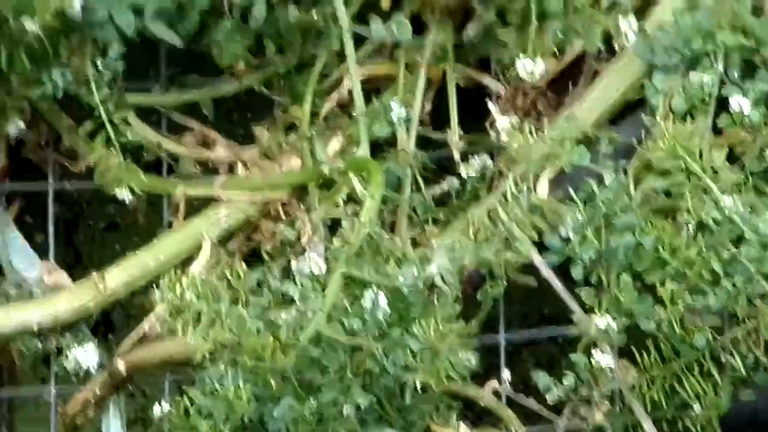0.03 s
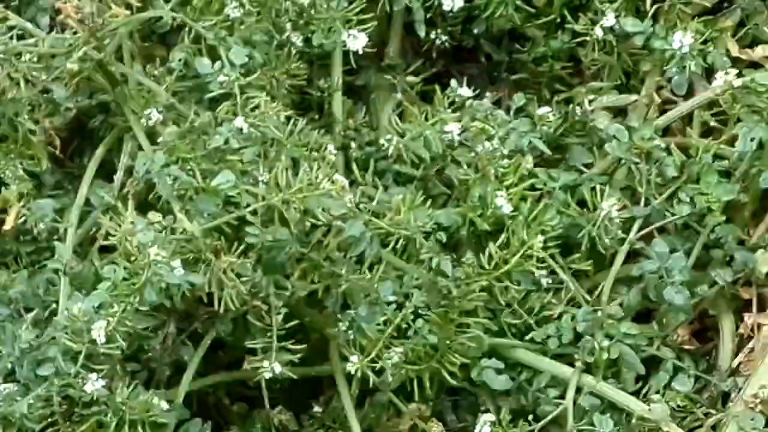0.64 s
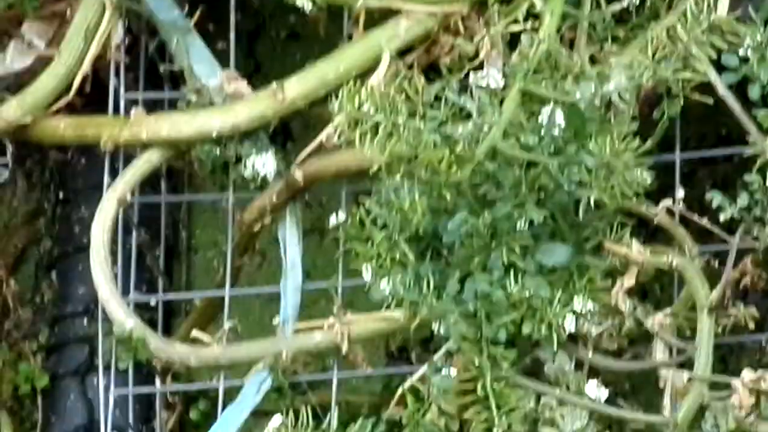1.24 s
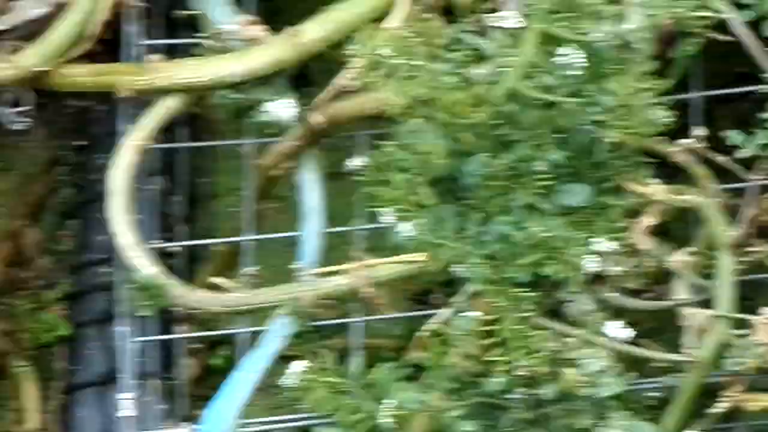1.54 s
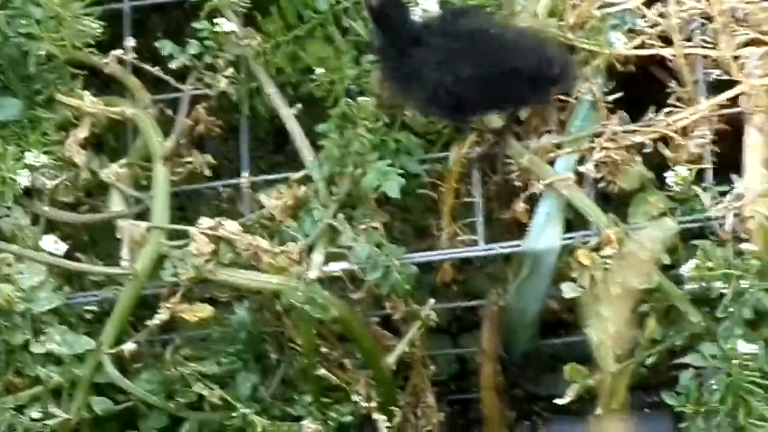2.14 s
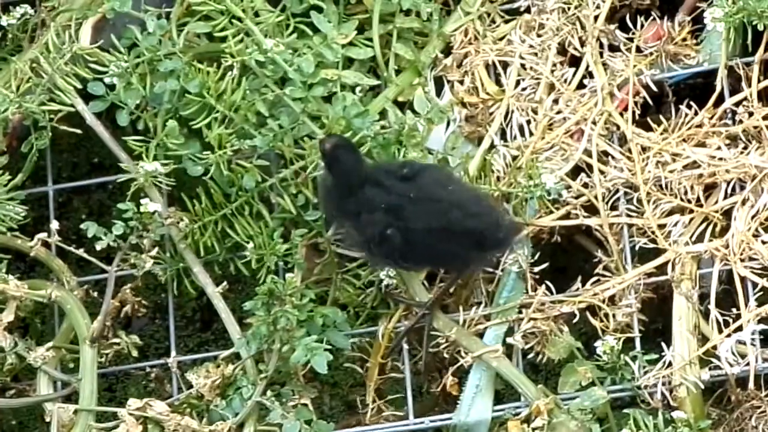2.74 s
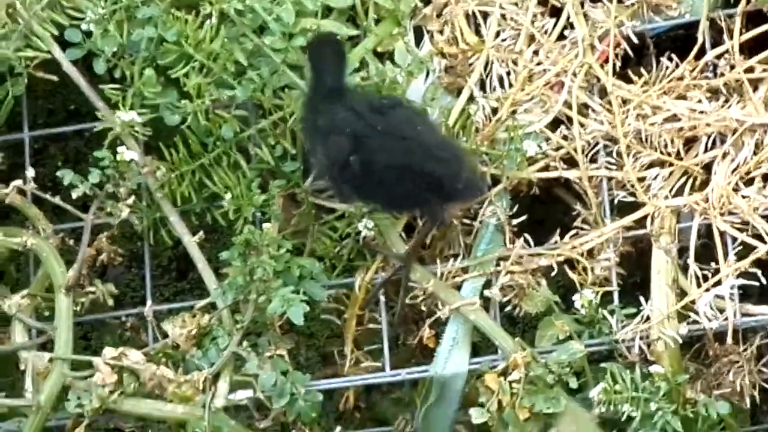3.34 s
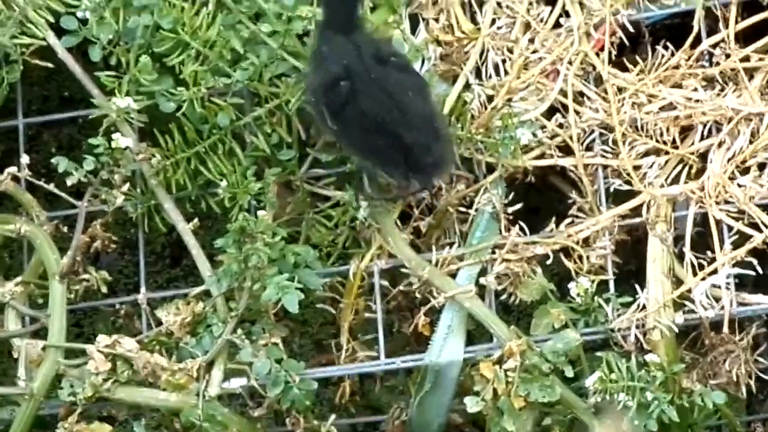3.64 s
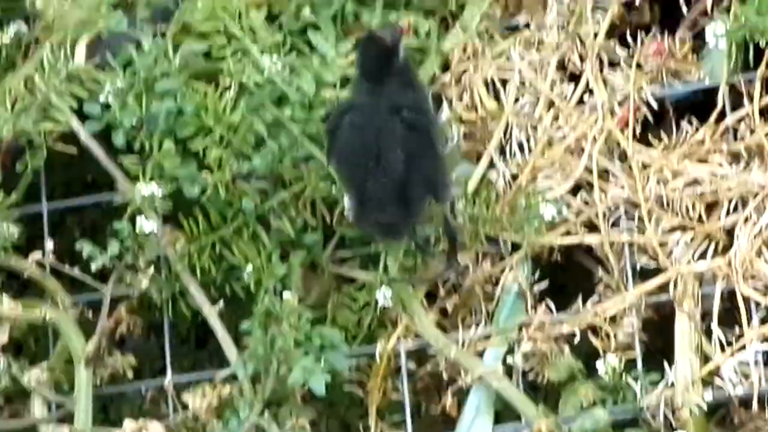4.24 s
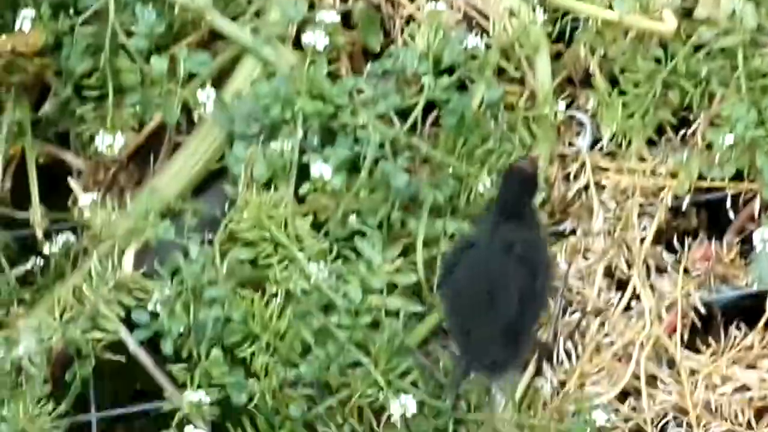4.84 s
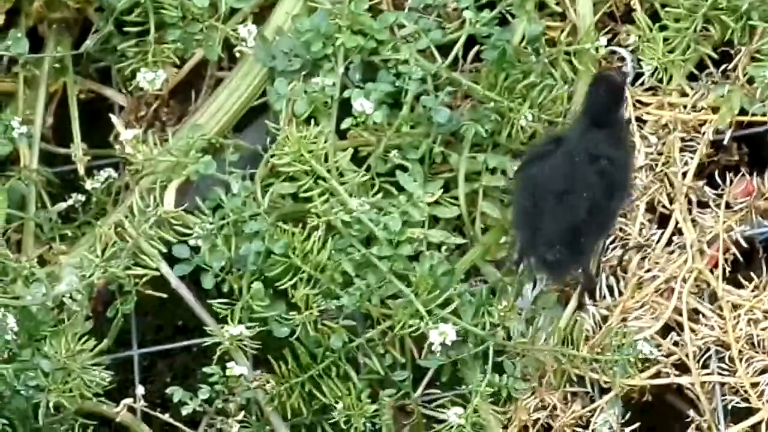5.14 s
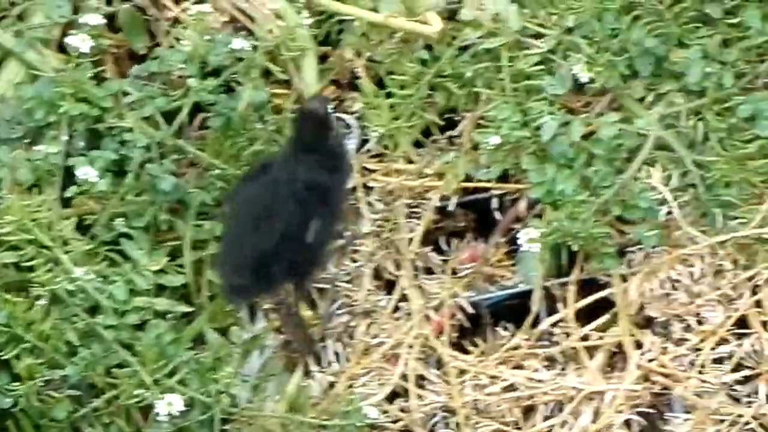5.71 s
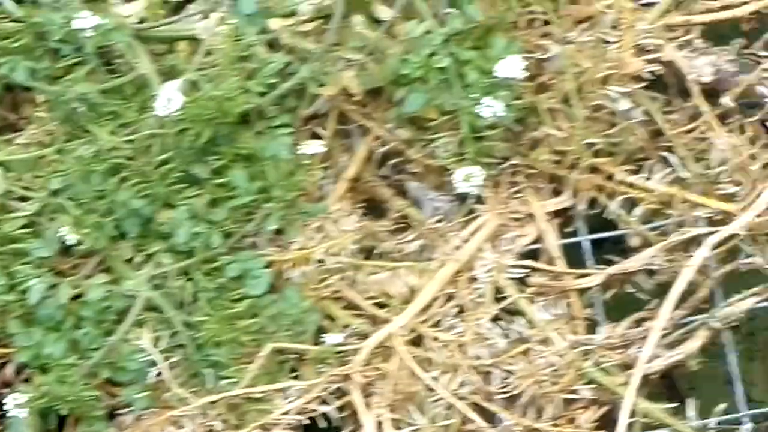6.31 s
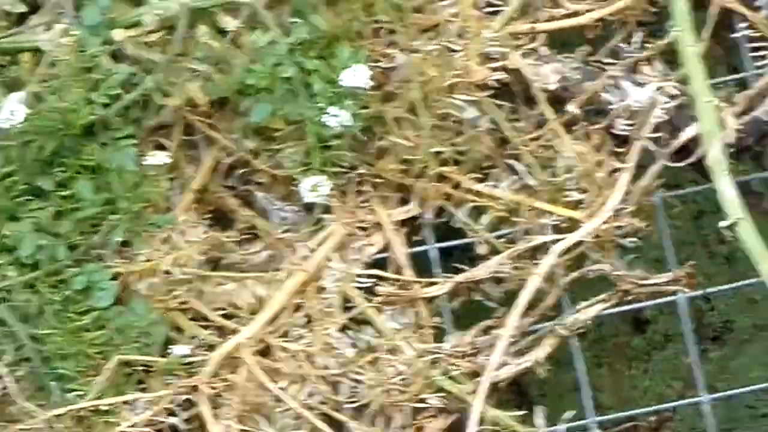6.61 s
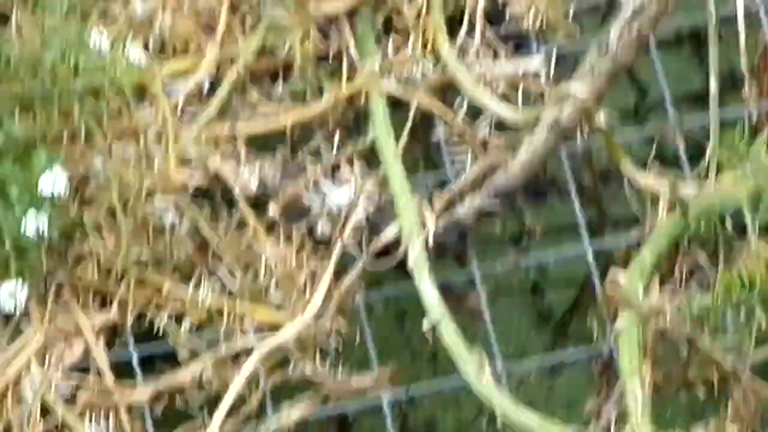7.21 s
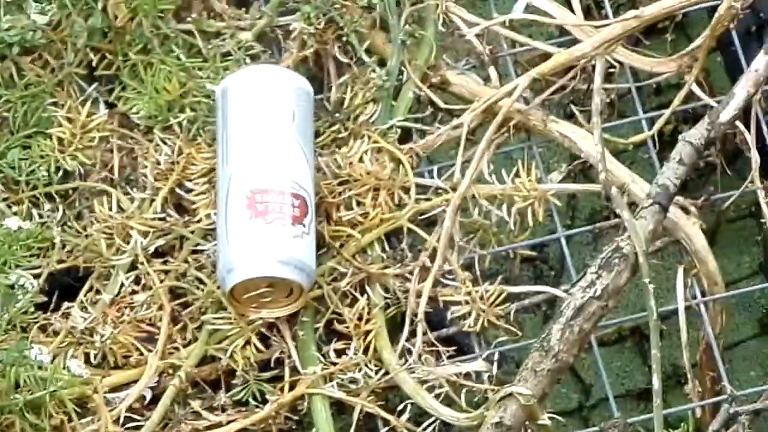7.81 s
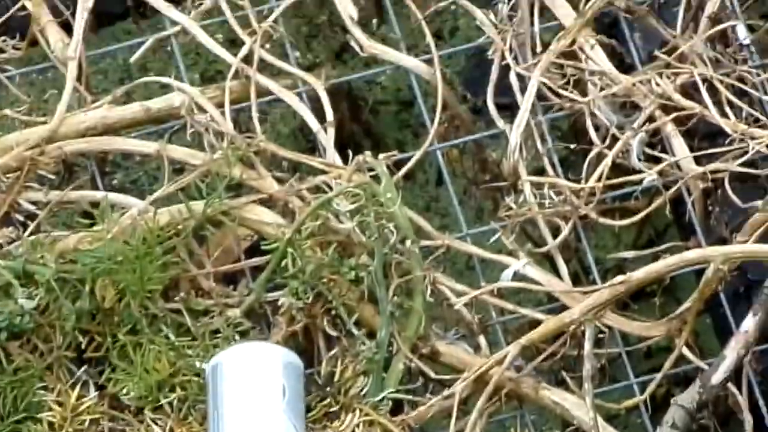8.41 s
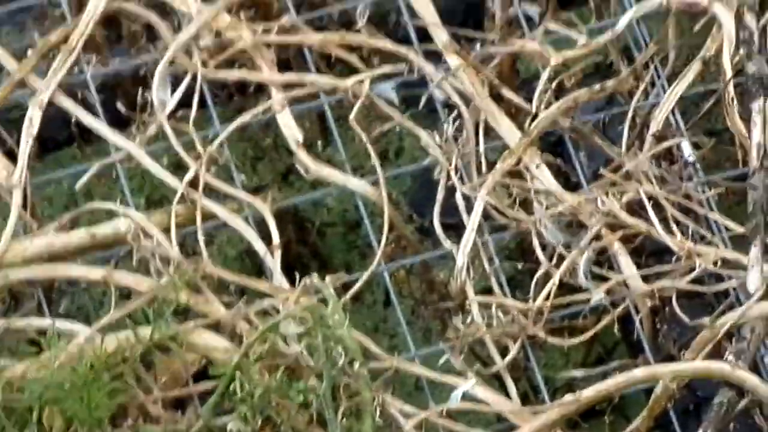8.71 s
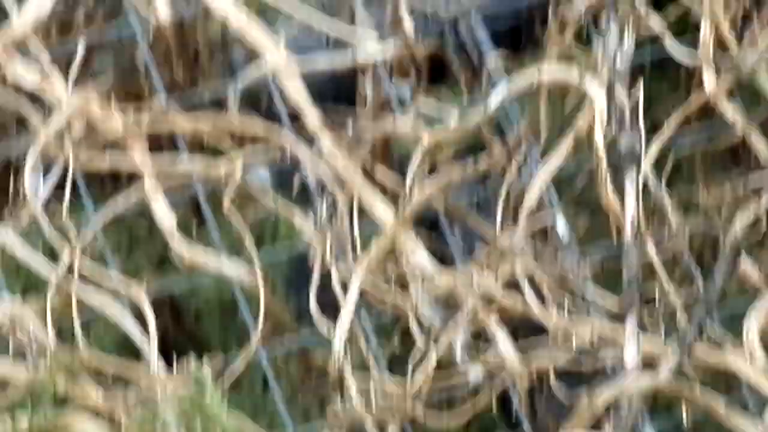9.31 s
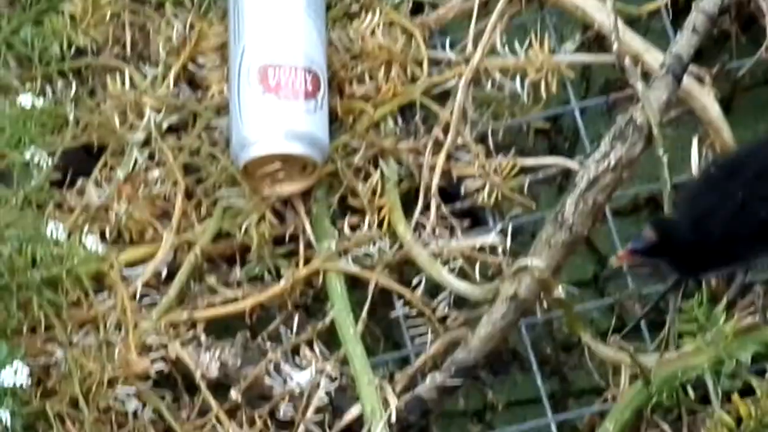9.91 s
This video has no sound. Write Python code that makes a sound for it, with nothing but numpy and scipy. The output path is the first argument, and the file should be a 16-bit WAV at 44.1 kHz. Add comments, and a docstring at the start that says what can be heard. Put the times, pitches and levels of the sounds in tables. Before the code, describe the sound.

At an overgrown pond, running water makes an even hiss that slowly grows louder. A sharp knock and a brief finger scrape hit the hand-held microphone first, then gusts of wind and dull thuds keep buffeting it. A pigeon coos four times, each a few spaced notes speeding into a falling purr, the last loudest. A moorhen chick peeps faintly and an adult clucks twice. The hiss drops suddenly near the end.

```python
"""A pigeon gives four purring coos, each a few spaced notes that speed up into a falling roll.
Behind it, at an overgrown pond, the countless splashes of running water merge into a hiss,
and moorhens peep and cluck faintly. Wind buffets the hand-held microphone, and fingers knock
and rub on its case. The whole sound slowly grows louder, then drops suddenly near the end."""
import sys
import numpy as np
from scipy import signal
from scipy.fft import rfft, irfft
from scipy.io import wavfile
from scipy.ndimage import uniform_filter1d

SR = 44100
rng = np.random.default_rng(int(sys.argv[2]) if len(sys.argv) > 2 else 0)


def transcribe(signal):
    """Save signal, clipped to [-1, 1], as a 16-bit WAV file at the path in sys.argv[1]."""
    frames = np.atleast_2d(signal).T
    limited = np.clip(frames, -1, 1)
    pcm = np.round(limited * 32767).astype(np.int16)
    wavfile.write(sys.argv[1], SR, pcm)


N = 438794
TIME = np.arange(N) / SR
LEAD_S = 0.03   # notes and thuds begin this long before their loudest moment

# the base level of the sound, which slowly grows louder: time_s, level_db
BASE_RISE = [(0.8, -70.5), (4.18, -52.5), (4.68, -52.5), (5.14, -49), (6.24, -45.5), (7.91, -37.5),
             (8.85, -38), (8.9, -40.5), (9.01, -39.5)]
# its sudden drop near the end: time_s, level_db
BASE_DROP = [(9.05, -46), (9.804, -45), (9.95, -43.5)]
# the mix of low and high sound in the water: frequency_hz, relative_db
WATER_COLOUR = [(100, 5), (400, 1), (620, 1.5), (800, 0), (1400, -1), (2400, 0), (4000, -3), (5600, -5),
                (7300, -5.5), (8800, -1.3), (9600, -6), (10800, -16), (12500, -29.5), (16000, -33)]
# the same for light wind: frequency_hz, relative_db
BREEZE_COLOUR = [(15, -6), (30, -12.5), (50, -1.5), (80, 0.5), (130, -1.5), (200, -10), (300, -20),
                 (500, -34), (1000, -40.5)]
# the same for the small swirls of air in a gust: frequency_hz, relative_db
SWIRL_COLOUR = [(40, -20), (75, -9), (130, 2.5), (210, 1), (320, -5.5), (480, -14.5), (750, -28),
                (1500, -47)]
# the strength of the light breeze: time_s, above_base_db
BREEZE = [(0.15, -7), (0.38, -1), (0.62, -18), (0.9, -4), (1.7, -2.5), (2.35, -5), (3.2, -0.5), (4.8, 3),
          (5.3, -7.5), (6.4, -4), (6.8, -11), (7.8, -6.5), (8.5, -6.5), (9.9, -4.5)]
# gusts of wind: start_s, hold_s, above_base_db
GUSTS = [(0.424, 0.032, 22.5), (0.772, 0.13, 8.5), (1.078, 0.095, 11), (1.23, 0.11, 2), (1.396, 0.13, 5.5),
         (1.575, 0.35, 4), (2.018, 0.2, 6.5), (2.46, 0.07, 4), (2.602, .16, 2.5), (2.846, .1, 3),
         (3.02, 0.12, 0.5), (3.534, 0.22, 9.5), (3.793, .025, 12), (3.88, 0.092, 3.5), (4.057, 0.17, 8.5),
         (4.288, 0.053, 11.5), (4.342, 0.035, 14.5), (4.494, 0.12, 0), (5.018, 0.099, 2.5),
         (5.513, .089, 0.5), (5.666, 0.079, 8), (5.798, 0.043, 16), (5.892, 0.21, 12.5),
         (6.475, 0.077, 2.5), (7.913, 0.29, -0.5), (8.304, 0.3, 2), (8.787, 0.29, 3), (9.17, 0.13, 2),
         (9.454, 0.11, -2), (9.595, 0.28, 2)]
# faint, short plinks, one at the very start: start_s, pitch_hz, peak_db, spread (a share of the pitch)
PLINKS = [(0.012, 555, -56.5, .11), (0.252, 400, -45, 0.35), (0.256, 700, -46, 0.25),
          (0.413, 560, -54, 0.37), (4.335, 680, -43.5, 0.32)]
# fingers knocking on the case: start_s, peak_db, body_hz, edge_hz
KNOCKS = [(0.0706, -11, 100, 994), (0.2585, -28, 74, 520)]
# dull thuds of air and hand on the microphone: time_s, peak_db, pitch_hz, decay_s
THUDS = [(0.416, -37, 240, 0.0017), (0.437, -39, 190, 0.0026), (0.452, -43, 172, 0.0026),
         (0.8, -50, 137, 0.0059), (1.099, -42, 193, 0.0037), (1.477, -42, 144, 0.0032),
         (1.874, -38, 173, 0.002), (2.483, -37, 218, 0.0017), (2.612, -50, 190, .005),
         (2.905, -52, 120, 0.004), (3.125, -48, 120, .005), (3.435, -26.5, 175, 0.0026),
         (3.578, -37, 218, 0.0041), (3.63, -29.5, 193, 0.0025), (3.693, -28, 159, 0.0048),
         (3.801, -32.5, 129, 0.011), (3.905, -33, 95, 0.0066), (4.168, -20.5, 136, 0.0016),
         (4.184, -29, 161, 0.0061), (4.322, -28.5, 199, .005), (4.355, -23, 85, 0.0084),
         (4.372, -23.5, 170, 0.003), (4.497, -22, 153, 0.0019), (4.512, -34, 150, 0.0056),
         (4.653, -23.5, 181, 0.0034), (5.543, -37, 84, 0.013), (5.733, -30.5, 190, .005),
         (5.753, -28.3, 130, 0.005), (5.783, -23, 150, 0.0032), (5.801, -19.5, 94.5, 0.012),
         (5.82, -19.5, 193, 0.007), (5.83, -19.5, 260, 0.0026), (5.897, -25, 130, .005),
         (5.925, -24, 190, 0.0035), (5.948, -25, 150, 0.005), (5.972, -21.5, 190, 0.0025),
         (5.999, -9, 221, 0.0014), (6.022, -24.5, 170, .004), (6.053, -21.5, 221, 0.0023),
         (6.076, -23, 150, 0.0034), (6.101, -16, 96, 0.007), (6.371, -27.5, 178, 0.0033),
         (7.066, -34, 120, 0.005), (7.35, -26.5, 95, 0.0068), (7.912, -18.5, 194, 0.0028),
         (7.929, -27, 114, 0.0072), (8.089, -18, 164, 0.0034), (8.552, -21, 141, 0.0073),
         (8.782, -27, 150, 0.0066), (8.863, -21, 200, 0.0042), (8.954, -23, 153, 0.0052),
         (8.998, -25, 170, 0.0036), (9.013, -16, 160, 0.0025), (9.052, -22.5, 107, 0.0032),
         (9.227, -31.3, 75, 0.0076), (9.42, -32.5, 100.6, 0.005), (9.639, -27, 107, 0.0033),
         (9.675, -28, 162, 0.0029), (9.755, -23.5, 120, 0.0051)]
# small sharp ticks, each with a bright crack: start_s, tick_db, crack_db
TICKS = [(0.588, -46, -46), (0.745, -52, -59), (9.013, -41, -32)]
# a fingertip skidding over the case: time_s, pitch_hz, peak_db
SKID = [(0.136, 3400, -82), (0.24, 3160, -63), (0.259, 3100, -49), (0.268, 3250, -45), (0.285, 5070, -47),
        (0.293, 7160, -60), (0.32, 8200, -61), (0.375, 8470, -62)]
# the hardest slips of that fingertip: start_s, peak_db, pitch_hz
HARD_SLIPS = [(0.267, -40, 3500), (0.2724, -50, 4000), (0.2772, -47, 4500), (0.2821, -43, 5200),
              (0.2865, -52, 6250)]
# a moorhen chick's peeps: start_s, top_pitch_hz, peak_db
PEEPS = [(4.065, 4350, -59), (5.795, 4660, -50), (5.828, 5400, -59)]
# a grown moorhen's double cluck: middle_s, pitch_hz, peak_db
CLUCKS = [(8.048, 1650, -28), (8.070, 1710, -31)]
# the spaced notes that open each coo: middle_s, pitch_hz, peak_db
COO_NOTES = [(2.03, 420, -61), (2.099, 378, -60), (2.193, 369, -47.5), (2.272, 372, -50), (2.336, 376, -48),
             (2.388, 383, -51), (2.416, 380, -48), (4.81, 370, -41.5), (4.894, 354, -41), (4.97, 375, -43),
             (5.009, 368, -39), (5.043, 379, -42), (5.092, 378, -41), (6.178, 365, -40), (6.25, 382, -41),
             (6.325, 390, -39), (6.42, 420, -43), (8.028, 430, -31.5), (8.104, 404, -33), (8.18, 397, -34),
             (8.27, 364, -27), (8.347, 370, -26.5), (8.414, 379, -25), (8.47, 390, -25.5),
             (8.506, 388, -28)]
# the purring roll that ends each coo:
# start_s, length_s, pitch_hz, sag (a share of the pitch), first_notes_per_s, last_notes_per_s, level_db
COO_ROLLS = [(2.468, 0.41, 383, 0.3, 49, 55, -47.5), (5.118, 0.3, 372, 0.23, 43, 52.5, -39.5),
             (6.438, 0.26, 382, 0.29, 46, 53, -40), (8.529, 0.42, 397, .16, 47, 60.5, -24.8)]


def from_db(db):
    """Turn decibels into a number to multiply a sound by."""
    return 10 ** (np.asarray(db) / 20)


def rms_one(x):
    """Scale a sound so that its average power is 1."""
    return x / np.sqrt(np.mean(x ** 2) + 1e-20)


def follow(rows, at=TIME):
    """Join a table's rows with straight lines and read each column at the given times."""
    times, *columns = np.transpose(rows)
    return [np.interp(at, times, column) for column in columns]


def filtered(x, hz, kind, order=2):
    """Keep the low part, the high part or a middle band of a sound."""
    return signal.sosfilt(signal.butter(order, np.clip(hz, 10, .45 * SR), kind, fs=SR, output="sos"), x)


def noise(colour):
    """Random noise with the given mix of low and high sound."""
    hz, db = np.transpose(colour)
    all_hz = np.maximum(np.arange(N // 2 + 1) * SR / N, 1)
    gain = from_db(np.interp(np.log(all_hz), np.log(hz), db))
    return rms_one(irfft(rfft(rng.standard_normal(N)) * gain, N))


def drift(per_s):
    """A random wobble that slides to a new value per_s times a second."""
    points = np.clip(rng.standard_normal(4096), -2, 2)
    return rms_one(np.interp(TIME * per_s, np.arange(len(points)), points))


def add(track, s, sound):
    """Mix a short sound into a track, starting at s seconds."""
    start = int(np.clip(s * SR, 0, N - 1))
    track[start:start + len(sound)] += sound[:N - start]


def water(base_db, boost_db=2.0, flutter_db=0.46, hush_db=-18.5, opens_s=0.21, opening_s=0.05):
    """Countless far splashes merge into an almost even hiss."""
    hushed = 1 - np.clip((TIME - opens_s) / opening_s, 0, 1)   # the first moment sounds quieter
    level_db = base_db + boost_db + hush_db * hushed + flutter_db * drift(40)
    return from_db(level_db) * noise(WATER_COLOUR)


def wind_strength(rise_s=0.021, fall_s=0.02):
    """Gusts spring up over the breeze, hold and die away; gives decibels above the base level."""
    power = from_db(follow(BREEZE)[0]) ** 2
    for s, hold_s, db in GUSTS:
        fade = np.maximum(s - TIME, 0) / rise_s + np.maximum(TIME - s - hold_s, 0) / fall_s
        power += (from_db(db) * np.exp(-np.minimum(fade, 20))) ** 2
    return 10 * np.log10(power)


def wind(base_db, boost_db=2.0, swirl_db=4.0, full_gust_db=23.5, lumpy_db=2.5, puff_db=3.5):
    """A lumpy rumble that sputters out now and then; strong gusts shed smaller, brighter swirls."""
    strength_db = wind_strength()
    gust = np.clip(strength_db / full_gust_db, 0, 1)
    air = noise(BREEZE_COLOUR) + from_db(swirl_db) * gust * noise(SWIRL_COLOUR)
    air *= from_db(lumpy_db * drift(70))
    air /= np.sqrt(uniform_filter1d(air ** 2, size=SR // 14))   # even out all but the quick lumps
    level_db = base_db + strength_db + boost_db + puff_db * np.minimum(drift(35), 1)
    return filtered(from_db(level_db) * air, 1400, "low", order=4)


def snap(hz, spread, decay_s):
    """A tiny burst of noise around one pitch."""
    t = TIME[:SR // 50]
    burst = rng.standard_normal(len(t)) * np.exp(-t / decay_s)
    burst = filtered(burst, [hz / (1 + spread), hz * (1 + spread)], "band")
    return burst / np.abs(burst).max()


def plinks():
    """Faint, short plinks, each a quickly fading burst of noise around one pitch."""
    out = np.zeros(N)
    for s, hz, db, spread in PLINKS:
        add(out, s, from_db(db) * snap(hz, spread, decay_s=0.013))
    return out


def knock(body_hz, edge_hz):
    """A sudden push on the microphone's thin skin leaks away and swings back once."""
    click = signal.unit_impulse(SR // 20)
    push = filtered(click, body_hz, "low", order=1)
    push = filtered(push, edge_hz, "low", order=1)
    pulse = filtered(push, body_hz, "high")
    return pulse / np.abs(pulse).max()


def thud(hz, decay_s, rise_share=0.28, edge_hz=750.0):
    """A soft shove of air that swings only once or twice."""
    t = TIME[:SR // 10] - LEAD_S
    loudness = np.exp(-np.logaddexp(-t / (rise_share * decay_s), t / decay_s))   # quick rise, slower fall
    swing = loudness / loudness.max() * np.sin(2 * np.pi * hz * t)
    return filtered(swing, edge_hz, "low", order=4)


def handling(slips_per_s=180.0, rasp_db=-2.5):
    """Knocks, thuds and ticks, and a fingertip that sticks and slips as it skids over the case."""
    out = np.zeros(N)
    for s, db, body_hz, edge_hz in KNOCKS:
        add(out, s, from_db(db) * knock(body_hz, edge_hz))
    for s, db, hz, decay_s in THUDS:
        add(out, s - LEAD_S, from_db(db) * thud(hz, decay_s))
    for s, db, hz in HARD_SLIPS:
        add(out, s, from_db(db) * snap(hz, spread=0.3, decay_s=0.00045))
    for s, tick_db, crack_db in TICKS:
        add(out, s, from_db(tick_db) * snap(hz=2900.0, spread=0.2, decay_s=0.0013))
        add(out, s, from_db(crack_db) * snap(hz=11000.0, spread=0.45, decay_s=0.00047))
    for s in np.arange(SKID[0][0], SKID[-1][0], 1 / slips_per_s):
        hz, db = follow(SKID, s)
        add(out, s + rng.normal(0, 0.00038), from_db(db) * snap(hz, spread=0.22, decay_s=0.0031))
        # the case rasps along
        add(out, s, from_db(db + rasp_db) * snap(hz=1260.0, spread=1.0, decay_s=0.0023))
    return out


def note(hz, width_s, shift_rad=0.0, overtone_db=-30.0):
    """A bird's voice box opens once: a few nearly pure waves swell and fade."""
    t = np.arange(-LEAD_S, LEAD_S, 1 / SR)
    phase = 2 * np.pi * hz * t + shift_rad
    loudness = np.exp(-0.5 * (t / width_s) ** 2)
    return loudness * (np.cos(phase) + from_db(overtone_db) * np.cos(2 * phase))


def moorhens(peep_s=0.06, arch=0.5, top_at=0.62, quaver=0.04):
    """A chick's thin, hoarse whistles arch up and tip over; a grown bird clucks twice."""
    out = np.zeros(N)
    progress = np.linspace(0, 1, int(peep_s * SR))
    for s, top_hz, db in PEEPS:
        hoarseness = quaver * drift(358)[:len(progress)]
        hz = top_hz * (1 - arch * (progress - top_at) ** 2 + hoarseness)
        whistle = np.sin(2 * np.pi * np.cumsum(hz) / SR)
        add(out, s, from_db(db) * signal.windows.tukey(len(hz), 0.3) * whistle)
    for s, hz, db in CLUCKS:
        add(out, s - LEAD_S, from_db(db) * note(hz, width_s=0.0019))
    return out


def roll(length_s, pitch_hz, sag, first_per_s, last_per_s):
    """A purr of ever quicker, shorter notes that sinks and fades as the pigeon runs out of air."""
    quicken_at, quicken_span = 0.43, 0.173   # shares of the roll's length
    soft_db, rise_s, fade_db = -5, 0.093, -10
    uneven_db, waver, stumble_rad = 0.7, 0.027, 0.5   # chance changes from note to note
    t = TIME[:int(length_s * SR)]
    quickened = 0.5 + 0.5 * np.tanh((t / length_s - quicken_at) / quicken_span)
    notes_per_s = first_per_s + (last_per_s - first_per_s) * quickened
    notes_so_far = np.cumsum(notes_per_s) / SR
    starts_s = np.interp(np.arange(notes_so_far[-1]), notes_so_far, t)
    out = np.zeros(SR)
    for s, (strength, detune, stumble) in zip(starts_s, rng.standard_normal(size=(40, 3))):
        spent = s / length_s
        db = soft_db * max(1 - s / rise_s, 0) + fade_db * spent ** 4 + uneven_db * strength
        hz = pitch_hz * (1 - sag * spent ** 1.74 + waver * detune)
        width_s = 0.22 / np.interp(s, t, notes_per_s)
        add(out, s, from_db(db) * note(hz, width_s, stumble_rad * stumble))
    return out


def pigeon(echo_db=-12.0, echo_decay_s=0.12):
    """Spaced notes run together into a purr; the surroundings throw a little of it back."""
    coos = np.zeros(N)
    for s, hz, db in COO_NOTES:
        add(coos, s - LEAD_S, from_db(db) * note(hz, width_s=0.0042))
    for s, length_s, hz, sag, first_per_s, last_per_s, db in COO_ROLLS:
        add(coos, s - LEAD_S, from_db(db) * roll(length_s, hz, sag, first_per_s, last_per_s))
    bounces = rng.standard_normal(SR // 2) * np.exp(-TIME[:SR // 2] / echo_decay_s)
    echo = signal.fftconvolve(coos, bounces / np.linalg.norm(bounces))[:N]
    return coos + from_db(echo_db) * echo


def scene(microphone_hiss_db=-93.5):
    """One microphone hears everything, adds its own faint hiss and feeds both channels."""
    base_db, = follow([*BASE_RISE, *BASE_DROP])
    sound = water(base_db) + wind(base_db) + plinks() + handling() + moorhens() + pigeon()
    sound += from_db(microphone_hiss_db) * rng.standard_normal(N)
    return np.array([sound, sound])


def record(dry):
    """The very highest sounds are cut off steeply."""
    cutoff_hz = 15800
    return signal.sosfilt(signal.ellip(10, 0.1, 70, cutoff_hz, fs=SR, output="sos"), dry)


dry = scene()
out = record(dry)
transcribe(out)
```